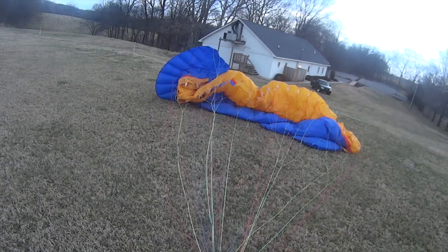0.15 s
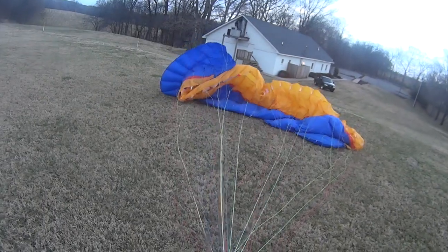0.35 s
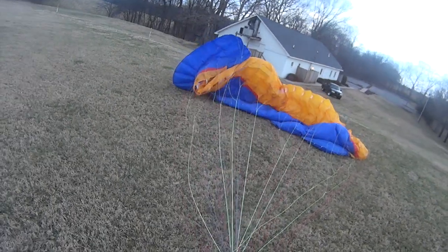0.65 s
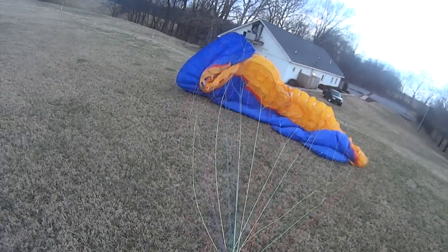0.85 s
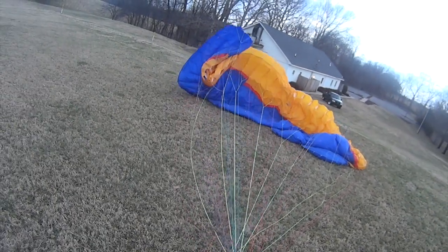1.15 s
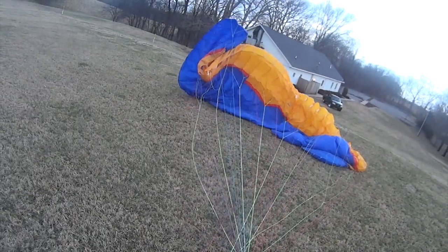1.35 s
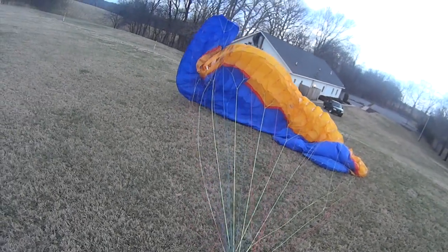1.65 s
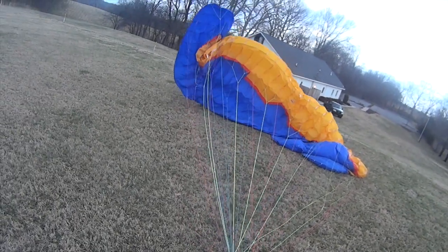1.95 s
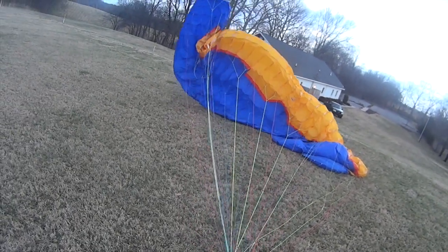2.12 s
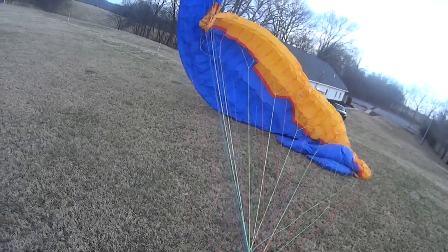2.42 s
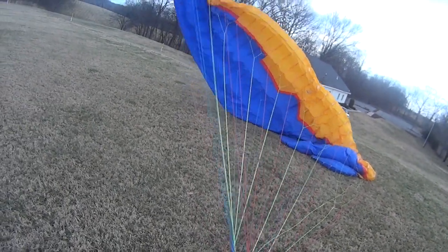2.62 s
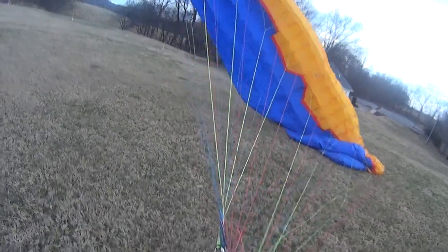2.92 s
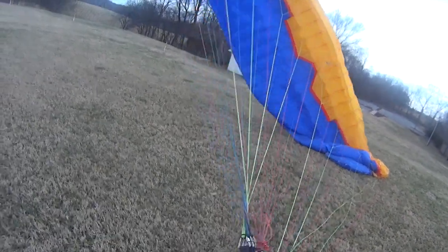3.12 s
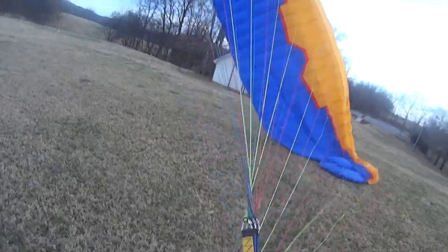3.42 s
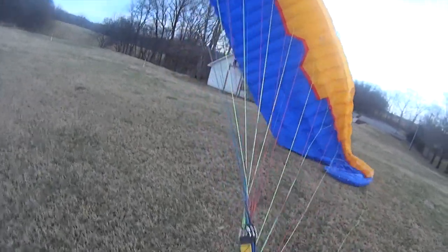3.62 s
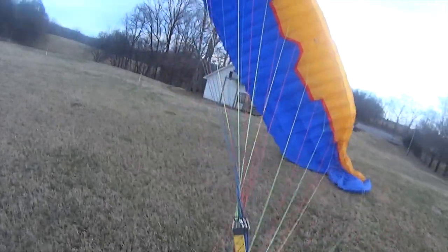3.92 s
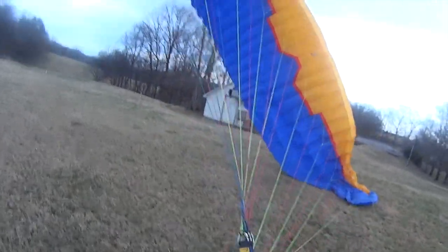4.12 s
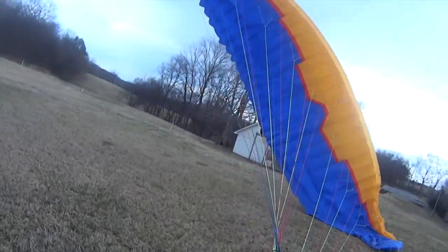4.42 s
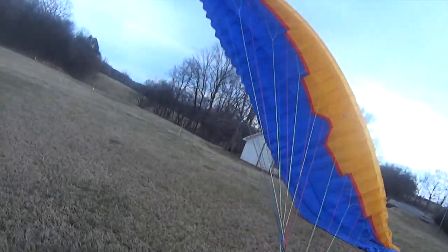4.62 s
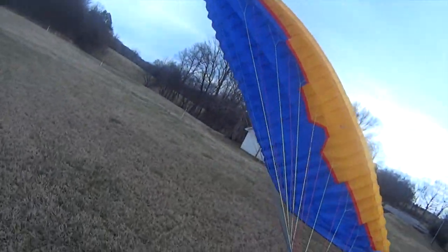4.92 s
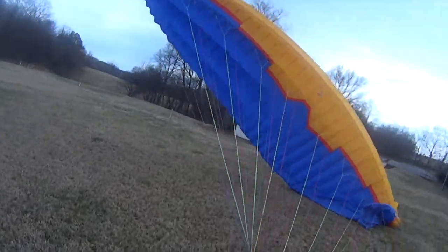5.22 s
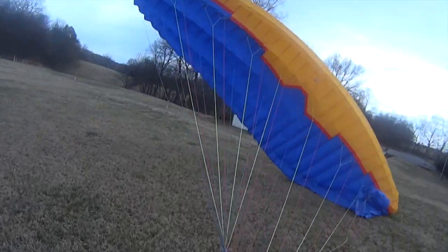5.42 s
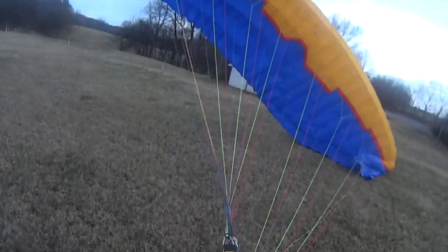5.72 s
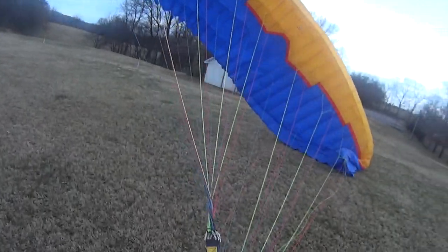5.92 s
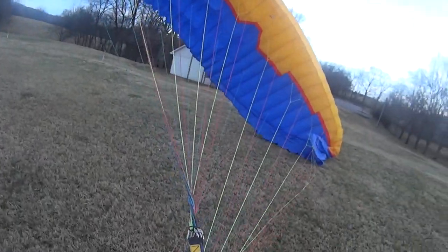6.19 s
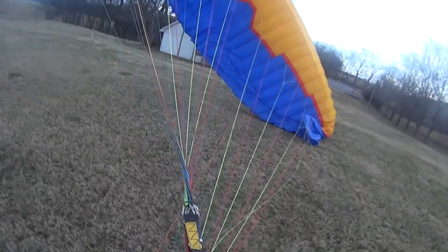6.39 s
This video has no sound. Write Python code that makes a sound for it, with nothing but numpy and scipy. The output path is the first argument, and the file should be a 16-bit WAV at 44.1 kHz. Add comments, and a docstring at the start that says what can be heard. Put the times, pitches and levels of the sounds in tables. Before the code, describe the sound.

Light wind buffets the microphone as a nylon paraglider wing hisses and crinkles, then jostled straps make the camera knock, creak and thump.

```python
"""A paraglider wing is pulled up off the grass into a light wind, heard from a camera worn by the pilot.
First, air buffets the microphone openings (the ports), and the nylon hisses and crinkles as it fills.
From 2.6 s the pilot moves and straps jostle the camera: its plastic case knocks and creaks, its mount
thumps, straps squeak and metal links clink. The hardest bumps come near 5.5 s, and a limiter turns
the sound down under them. Last, just after 6 s, a sleeve brushes past."""
import sys
import numpy as np
from scipy.fft import rfft, irfft, next_fast_len
from scipy.io import wavfile
from scipy.ndimage import uniform_filter1d, minimum_filter1d, map_coordinates

SR = 44100
rng = np.random.default_rng(int(sys.argv[2]) if len(sys.argv) > 2 else 0)


def output_pcm(signal):
    """Save a mono or channel-first signal as 16-bit PCM at the path in sys.argv[1].

    Samples are clipped to [-1, 1] before scaling.
    """
    pcm = np.clip(np.atleast_2d(signal).T, -1, 1) * 32767
    wavfile.write(sys.argv[1], SR, np.round(pcm).astype(np.int16))


N = 288855


def amp(db):
    """Turn decibels into a number to multiply by."""
    return 10 ** (np.asarray(db) / 20)


def unit(x):
    """Scale a signal so its average strength (rms) is 1."""
    return x / np.sqrt(np.mean(x ** 2) + 1e-20)


def along(points, hz):
    """Read between (Hz, value) points on a log frequency scale."""
    f, v = np.transpose(points)
    return np.interp(np.log(hz + 1), np.log(f + 1), v)


def curve(rows):
    """Join (seconds, value) points with straight lines, one value per sample."""
    times, values = np.transpose(rows)
    return np.interp(np.arange(N) / SR, times, values)


def wobble(rate):
    """A smooth random curve through `rate` points a second."""
    points = rng.standard_normal(int(N * rate / SR) + 4)
    return map_coordinates(points, [np.arange(N) * rate / SR])


def filtered(x, response):
    """Multiply each frequency in x by response(hz)."""
    m = next_fast_len(N + SR // 2)
    return irfft(rfft(x, m) * response(np.fft.rfftfreq(m, 1 / SR)), m)[..., :N]


def add(track, s, sound):
    """Mix a sound into the track, starting at s seconds."""
    part = track[:, round(s * SR):][:, :sound.shape[1]]
    part += sound[:, :part.shape[1]]


def ring(hz, t60, pan_db, lead, attack, size=SR // 5):
    """One ringing tone as the two ports hear it; it fades by 60 dB in t60 seconds."""
    t, side = np.arange(size) / SR, np.array([[.5], [-.5]])
    fade = np.exp(-np.log(1000) * t / t60) * (1 - np.exp(-t / attack))
    return amp(side * pan_db) * fade * np.sin(2 * np.pi * hz * t - side * lead)


def crinkle(rate, spread_db):
    """Tiny snaps of unequal size at random moments, about `rate` a second."""
    snaps = (rng.random((2, N)) < rate / SR) * rng.standard_normal((2, N))
    return unit(snaps * amp(spread_db * rng.standard_normal((2, N))))


# How the two ports differ. Each row: frequency in Hz, left over right in dB, right's lead in radians.
PORTS = [(30, 2, 0), (130, -2, .1), (200, -3, 1), (300, -1, 2.4), (430, 0, 2.4), (700, 3, 1.4),
         (1200, 1, .8), (1650, 1, .7), (2080, -4, .8), (2700, 0, .45), (11000, -.5, .35)]
def spread(pair, spectrum, alike):
    """Shape the tone of two unrelated signals and blend them into the left and right ports."""
    def colour(hz):
        turn = np.arccos(np.clip(along(alike, hz), -1, 1)) / 2
        return amp(along(spectrum, hz)) * np.array([np.cos(turn), np.sin(turn)])

    def ports(hz):
        at, pan_db, lead = np.transpose(PORTS)
        side = np.array([[.5], [-.5]])
        gain = amp(side * along(np.c_[at, pan_db], hz))
        return gain * np.exp(-1j * side * along(np.c_[at, lead], hz))

    mid, side = filtered(pair, colour)
    return unit(filtered(np.array([mid + side, mid - side]), ports))


# The breeze over the field. Each row: time in seconds, relative level in dB.
BREEZE = [(0.0, -48), (1.88, -54.5), (2.9, -42.5), (3.19, -47), (3.76, -41.5), (4.45, -43), (6.55, -45.5)]
# Its tone. Each row: frequency in Hz, relative level in dB.
BREEZE_TONE = [(30, -22), (120, -5), (220, -5.5), (300, 2), (400, -10.5), (470, -5), (560, -12), (900, -13),
               (1300, -16.5), (2500, -50.5)]
def breeze(gain_db=3):
    """Air moves over the open field in a faint, low murmur."""
    level_db = curve(BREEZE) + gain_db + 2.46 * wobble(4.113)
    return amp(level_db) * spread(rng.standard_normal((2, N)), BREEZE_TONE, [(300, 0.96), (900, 0.17)])


def stirred_air(gain_db=-20.5, rise_s=.02, fall_s=0.077):
    """Each bump in THUMPS swings the camera through the air: the flow swells and dies away."""
    t, power = np.arange(N) / SR, 0
    for s, _, _, push_db in THUMPS:
        fade = np.maximum((s - t) / rise_s, (t - s) / fall_s)
        power = power + amp(2 * push_db) * np.exp(-2 * fade)
    return amp(gain_db) * np.sqrt(power)


# Wind on the ports. Each row: time in seconds, relative level in dB.
GUSTS = [(0.0, -52.5), (0.95, -57.5), (2.53, -51), (2.81, -35.5), (3.19, -46.5), (3.54, -35), (4.51, -43),
         (4.8, -47.5), (5.49, -47), (5.62, -37), (5.76, -55), (6.55, -45)]
# Its rumble. Each row: frequency in Hz, relative level in dB.
BUFFET_TONE = [(10, -12), (32, 0), (55, -7), (110, -13), (180, -14), (260, -21), (400, -32), (1200, -55)]
# Its stereo width. Each row: frequency in Hz, how alike left and right are (1 is most alike).
BUFFET_ALIKE = [(60, .92), (130, .75), (280, .6)]
def buffeting(gain_db=3.5):
    """Swirls of air press on the ports in uneven lumps."""
    lumps = amp(3 * wobble(12))
    flow = np.hypot(amp(curve(GUSTS) + gain_db), stirred_air())
    return flow * lumps * spread(rng.standard_normal((2, N)), BUFFET_TONE, BUFFET_ALIKE)


# The wing's sliding nylon. Each row: time in seconds, relative level in dB.
WING = [(0.0, -36.5), (0.03, -38), (0.85, -42), (1.02, -36), (1.27, -42), (2.16, -40), (2.72, -33.5),
        (2.83, -28.5), (3.1, -33.5), (3.67, -31.5), (3.74, -38), (3.87, -34.5), (4.04, -41), (4.3, -38),
        (4.62, -42.5), (4.77, -39), (5.25, -41.5)]
# Its hiss. Each row: frequency in Hz, relative level in dB.
NYLON_TONE = [(500, -18), (1050, -13), (1550, -3.5), (2080, 2.5), (2500, -4), (3050, -8), (4000, -7.5),
              (5050, -2.5), (6300, -10.5), (7300, -8), (8750, -15), (9700, -11), (11000, -20)]
# The stereo width of cloth. Each row: frequency in Hz, how alike left and right are.
CLOTH_ALIKE = [(600, 0.1), (1200, 0.55), (2300, 0.95), (3500, 0.91), (6000, 0.95), (11000, 0.89)]
def nylon(gain_db=4.5):
    """Sliding cloth hisses, and countless small creases snap in it."""
    cloth = rng.standard_normal((2, N)) + 0.52 * crinkle(rate=1500, spread_db=1.0)
    level_db = curve(WING) + gain_db + 0.85 * wobble(25)
    return amp(level_db) * spread(cloth, NYLON_TONE, CLOTH_ALIKE)


# A sleeve brushing past. Each row: time in seconds, level in dB.
BRUSH = [(6.12, -67), (6.19, -44), (6.235, -34), (6.27, -41), (6.33, -43), (6.42, -51), (6.5, -75)]
# Its hiss. Each row: frequency in Hz, relative level in dB.
SLEEVE_TONE = [(2000, -30), (5500, -12), (7500, 24), (8800, 14), (10500, 13.5)]
def sleeve():
    """Smooth cloth slides close by in a soft, high swish."""
    level_db = curve(BRUSH) + 2.5 * wobble(50)
    return amp(level_db) * spread(rng.standard_normal((2, N)), SLEEVE_TONE, CLOTH_ALIKE)


# Metal links touching. Each row: start in seconds, peak level in dB.
CLINKS = [(3.2576, -5), (6.206, -25), (6.232, -19), (6.329, -25)]
# The tones of a link. Each row: pitch in Hz, ring time in seconds, relative level in dB.
METAL_TONES = [(4800, .008, -7), (7300, .004, 0), (8600, .003, -3), (10100, .004, 1)]
def clinks():
    """Small metal links on the wing's straps tick against each other and ring briefly."""
    track = np.zeros((2, N))
    for s, db in CLINKS:
        sound = 0
        for hz, t60, tone_db in METAL_TONES:
            gain = amp(tone_db + rng.normal(0, 1))
            pitch = hz * rng.normal(1, 0.066)
            sound = sound + gain * ring(pitch, t60, pan_db=3, lead=0.24, attack=.0001)
        add(track, s, amp(db) * sound / np.abs(sound).max())
    return track


# Strap squeaks. Each row: start in seconds, length in seconds, pitch in Hz, peak level in dB,
# left over right in dB, right's lead in radians.
SQUEAKS = [(1.643, .003, 2000, -8, -4, -2), (2.626, 0.019, 1880, -12.5, -6, -2),
           (2.649, 0.006, 1960, -5.5, -3, -2), (2.815, 0.024, 1910, -5.5, -5, -2),
           (4.051, .006, 1900, -11, -2, 1.7), (4.183, .005, 1810, -13.5, -1, 1.5),
           (4.754, 0.021, 1820, -16.5, 1, -1.7), (4.77, 0.013, 2410, -5, -4, -2),
           (6.538, .02, 2080, -17, 0.5, 0.4)]
def squeaks(slips_per_s=450, jitter=0.25, t60=.008, detune=.05):
    """A tight strap sticks and slips at an uneven rate, and each slip rings one high tone."""
    track = np.zeros((2, N))
    for s, length, hz, db, pan_db, lead in SQUEAKS:
        gaps, sizes, shifts = rng.standard_normal((3, 32))
        times = np.cumsum(np.exp(jitter * gaps)) / slips_per_s
        times = times - times[0]
        burst = np.zeros((2, SR // 10))
        for at, size, shift in zip(times[times < length], sizes, shifts):
            slip = ring(hz * (1 + detune * shift), t60, pan_db, lead, attack=.0004, size=SR // 20)
            add(burst, at, amp(2 * size) * slip)
        add(track, s, amp(db) * burst / np.abs(burst).max())
    return track


# Straps scraping on the mount. Each row: frequency in Hz, relative level in dB.
SCRAPE_TONE = [(60, -10), (200, 2), (310, 10), (390, -5), (470, 8), (540, -11.5), (660, 3.5), (800, -5.5),
               (1250, -0.5), (2100, -10.5), (3200, -20), (8000, -65)]
def rubbing(contacts, gain_db=-18, brisk_s=0.033, settle_s=0.34, settle_db=-20):
    """After each contact the strap creeps over the mount in tiny slips, briskly, then faintly."""
    t, power = np.arange(SR // 2) / SR, np.zeros((1, N))
    creep = np.exp(-t / brisk_s) + amp(settle_db) * np.exp(-t / settle_s)
    for s, db, _ in contacts:
        add(power, s, (amp(db) * creep[None]) ** 2)
    scrape = spread(crinkle(rate=2500, spread_db=0.5), SCRAPE_TONE, [(500, 0.98)])
    return amp(gain_db) * np.sqrt(power) * scrape


# Soft bumps on the mount. Each row: start in seconds, ring level in dB, pitch in Hz, air push in dB.
THUMPS = [(2.741, -10, 194, -28), (2.891, -20, 184, -30), (2.948, -23, 201, -18), (3.142, -25, 220, -21),
          (3.479, -14, 201, -24), (3.613, -5.5, 189, -17), (3.7, -4, 175.5, -30), (3.875, -21, 186, -17),
          (4.019, -15, 186, -22), (4.121, -2, 174, -18), (4.285, -10, 214, -13), (4.333, -24, 178, -11),
          (4.634, -36, 270, -15), (5.027, -20.5, 182, -22.5), (5.531, 7.5, 160, 6.5), (5.546, -3.5, 220, 0),
          (5.626, 9, 240, -4.5), (6.36, -30, 270, -19)]
def thumps(push_s=0.0024, overtone_db=-9, sway_db=-5, damping_per_db=0.0541):
    """A soft bump pushes air into each port, rings the mount and sways the camera."""
    track, t = np.zeros((2, N)), np.arange(SR // 5) / SR
    sway = ring(32, .2, pan_db=2.5, lead=.3, attack=.01)
    for s, ring_db, hz, push_db in THUMPS:
        t60 = 0.067 * np.exp(-damping_per_db * ring_db)  # harder bumps squeeze the mount and damp it
        u = t / (push_s * np.exp(.35 * rng.standard_normal((2, 1))))
        push = 2 * u * (2 - u) * np.exp(-u) * (1 - np.exp(-2 * u))  # a swell, then a slower rebound
        mount = ring(hz, t60, pan_db=-3.5, lead=1.5, attack=.006)
        overtone = ring(rng.normal(315, 20), t60 / 2, pan_db=-1, lead=2.5, attack=.004)
        ringing = amp(ring_db) * (mount + amp(overtone_db) * overtone)
        add(track, s, ringing + amp(push_db) * (push + amp(sway_db) * sway))
    return track


def faint_ticks(count=18, from_s=2.6, db=-23, bright_hz=1540):
    """Light touches land on the case at random while the pilot moves. Gives rows like KNOCKS."""
    times = from_s + (N / SR - from_s) * (np.arange(count) + rng.random(count)) / count
    return [(s, db + size, bright_hz) for s, size in zip(times, rng.standard_normal(count))]


# Creaks of the case. Each row: start in seconds, length in seconds, relative level in dB.
CREAKS = [(3.69, .019, -15), (3.937, .021, -10), (4.066, .034, -12.5), (4.483, .013, -19.5),
          (4.882, .018, -12), (5.441, .031, -9), (5.513, .018, -15.5), (5.596, .018, -8.5),
          (6.494, .013, -26.5)]
def creak_slips(gap_s=.0055, jitter=0.18, fade_db_per_s=148, bright_hz=1260):
    """A creak is a quick run of slips that weaken as the strain lets go. Gives rows like KNOCKS."""
    slips = []
    for s, length, db in CREAKS:
        gaps, sizes = rng.standard_normal((2, 12))
        times = np.r_[0, np.cumsum(gap_s * np.exp(jitter * gaps))]
        for t, size in zip(times[times < length], sizes):
            slips.append((s + t, db - fade_db_per_s * t + 0.5 * size, bright_hz))
    return slips


# The tones of the plastic case. Each row: pitch in Hz, ring time in seconds, relative level in dB,
# left over right in dB, right's lead in radians.
CASE_TONES = [(175, 0.068, -16.5, -1, 0.18), (307.3, 0.059, -15, -3, 1.54), (479, 0.098, -20.5, 0, 1.75),
              (631, 0.034, -12.5, 3, 1.56), (860, 0.0081, -4.5, 4, 1.16), (1170, 0.011, -2.5, 1.5, 0.89),
              (1350, 0.0069, -0.5, 2.5, 0.37), (1837, 0.022, -16, -6.5, 1.4), (2030, 0.0071, -6, -2, 0.7),
              (2920, 0.0013, 5.5, 3.5, 0.84), (4760, 0.0073, -22, -14, .2)]
def case_ring(bright_hz, focus_db=6, focus_octaves=0.74, scatter_db=3, detune=.035):
    """One contact rings all the tones of the case, with a boost for those near bright_hz."""
    sound, sign = 0, 1
    for hz, t60, db, pan_db, lead in CASE_TONES:
        size, shift, place = rng.standard_normal(3)
        boost_db = focus_db * np.exp(-(np.log2(hz / bright_hz) / focus_octaves) ** 2)
        pitch = hz * (1 + detune * shift)
        tone = ring(pitch, t60, pan_db, lead + .35 * place, attack=.0003, size=SR // 20)
        sound = sound + sign * amp(db + boost_db + scatter_db * size) * tone
        sign = -sign  # neighbouring tones swing opposite ways, so the ring takes a cycle to build
    start = sound[:, :int(.004 * SR)]  # the first 4 ms set the level
    return sound / np.sqrt(np.mean(start ** 2))


# Single knocks of the case. Each row: start in seconds, relative level in dB, brightness in Hz.
KNOCKS = [(2.605, -18, 1190), (2.86, -10.5, 1550), (2.892, -14, 1670), (2.955, -20.5, 1500),
          (3.163, -21, 1470), (3.388, -9.5, 1200), (3.454, -10.5, 1300), (3.477, -12, 1800),
          (3.584, -9.5, 1390), (3.674, -9.5, 1380), (3.734, -12.5, 1260), (3.833, -11, 1290),
          (3.87, -13.5, 1750), (4.014, -8, 1250), (4.142, -10.5, 1270), (4.277, -10, 1780),
          (4.332, -9, 1220), (4.375, -14.5, 1730), (4.398, -11.5, 1310), (4.612, -15, 1360),
          (4.687, -11, 1200), (5.093, -15, 1380), (5.103, -12.5, 1450), (5.207, -11.5, 1560),
          (5.536, -3, 700), (5.575, -6, 1300), (5.691, -13.5, 1340), (5.749, -11.5, 1170),
          (5.997, -17.5, 960), (6.148, -12, 1500), (6.304, -13, 1100), (6.36, -14, 1380),
          (6.376, -18, 1360)]
def knocks(contacts, gain_db=-4.5, rebound_s=.0024, rebound_db=-12):
    """The case slips sharply in its mount and chatters once as it settles."""
    track = np.zeros((2, N))
    for s, db, bright_hz in contacts:
        delay, size = rng.standard_normal(2)
        add(track, s, amp(db + gain_db) * case_ring(bright_hz))
        rebound = amp(db + gain_db + rebound_db + 2 * size) * case_ring(bright_hz)
        add(track, s + rebound_s * np.exp(0.27 * delay), rebound)
    return track


def scene():
    """Wing and wind, with the jostled camera close by."""
    around = nylon() + buffeting() + breeze() + thumps() + squeaks() + clinks() + sleeve()
    contacts = list(KNOCKS) + faint_ticks() + creak_slips()
    return around + rubbing(contacts) + knocks(contacts)


def limiter(x, ceiling_db=-4, hold_s=0.0244):
    """The volume dips at any peak above the ceiling and soon comes back."""
    needed = np.minimum(1, amp(ceiling_db) / (np.abs(x).max(axis=0) + 1e-9))
    size = 2 * int(hold_s * SR / 2) + 1
    held = minimum_filter1d(needed, size, origin=size // 2)
    return x * uniform_filter1d(held, size=44)


def record(dry):
    """The camera limits its peaks and cuts off the highest treble."""
    return filtered(limiter(dry), lambda hz: hz < 11150)


dry = scene()
out = record(dry)
output_pcm(out)
```